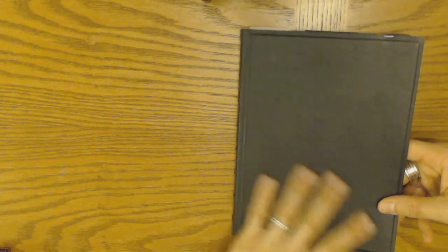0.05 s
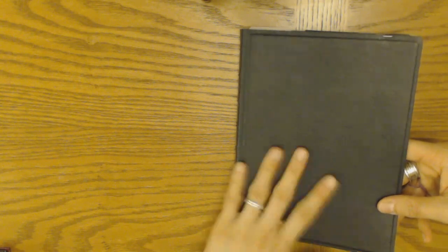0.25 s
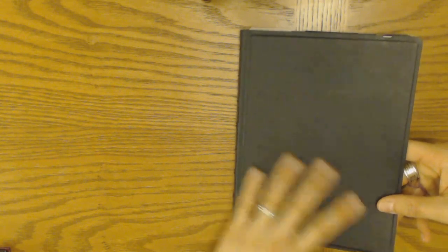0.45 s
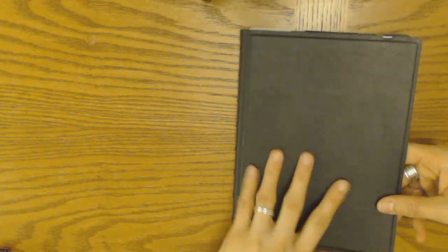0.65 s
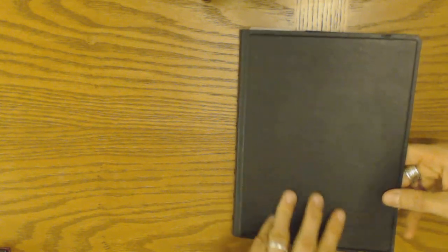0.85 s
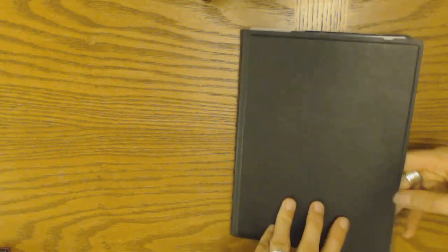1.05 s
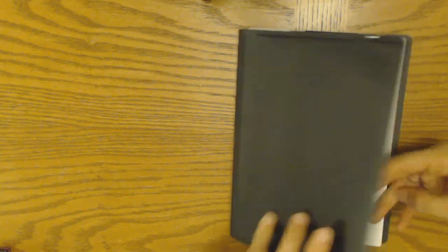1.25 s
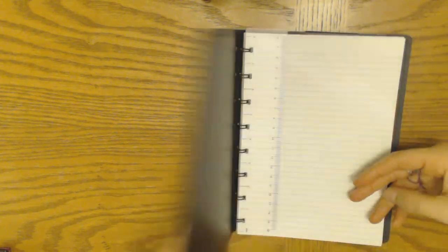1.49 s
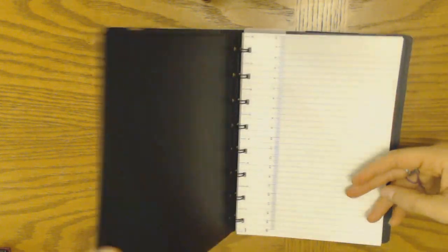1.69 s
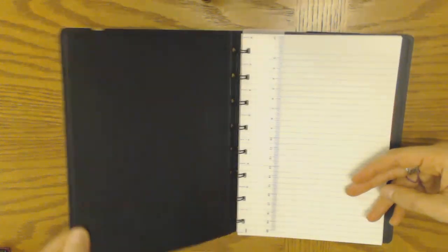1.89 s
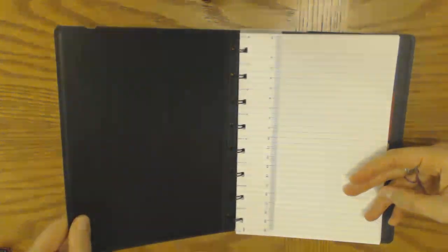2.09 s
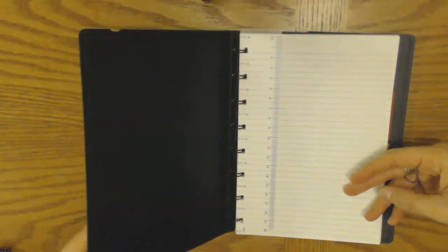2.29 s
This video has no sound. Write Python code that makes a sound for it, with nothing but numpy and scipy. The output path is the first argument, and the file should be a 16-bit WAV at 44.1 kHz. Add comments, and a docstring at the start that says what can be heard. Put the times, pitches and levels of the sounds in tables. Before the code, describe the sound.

A leatherlike notebook is handled and opened close by in a quiet room. A hand softly rubs the cover, which lifts with a click and thump. The spine crackles briefly, then the cover slides and taps the wooden table.

```python
"""A quiet room hisses and rumbles throughout. Close by, a hand rubs to and fro over a leatherlike
notebook cover on a wooden table. A finger taps; the thumb lifts the cover with a click and a thump.
The cover swings open and the bending spine unsticks in a short bright crackle with a faint squeak.
The cover slides out, scrapes the table and lands with a soft tap."""
import sys
import numpy as np
from scipy import signal
from scipy.fft import rfft, irfft, next_fast_len
from scipy.io import wavfile
from scipy.ndimage import map_coordinates

SR = 44100
rng = np.random.default_rng(int(sys.argv[2]) if len(sys.argv) > 2 else 0)


def store_wav(level_fs):
    """Save 16-bit WAV to argv[1]."""
    pcm = np.round(np.clip(np.atleast_2d(level_fs), -1, 1) * 32767)
    wavfile.write(sys.argv[1], SR, pcm.T.astype(np.int16))


N = 102885


def amp(db):
    """Decibels to gain."""
    return 10 ** (np.asarray(db) / 20)


def unit(x):
    """Scale to rms 1."""
    return x / np.sqrt(np.mean(x ** 2) + 1e-20)


def clock():
    """Sample times in seconds."""
    return np.arange(N) / SR


def envelope(points):
    """Gain along (time [s], level [dB]) points, silent outside them."""
    time_s, db = np.transpose(points)
    return amp(np.interp(clock(), time_s, db, left=-200, right=-200))


def coloured(x, colour, tilt_db_oct=0):
    """Minimum-phase filter through (frequency [Hz], gain [dB]) points, tilted above 1 kHz."""
    size = 2 * next_fast_len(len(x))
    octave = np.log2(np.fft.rfftfreq(size, 1 / SR) + 1)
    hz, db = np.transpose(colour)
    tilt_db = tilt_db_oct * np.clip(octave - np.log2(1000), 0, None)
    gain = amp(np.interp(octave, np.log2(hz), db) + tilt_db)
    cepstrum = irfft(np.log(gain))
    cepstrum[1:size // 2] *= 2  # fold to causal
    cepstrum[size // 2 + 1:] = 0
    return irfft(rfft(x, size) * np.exp(rfft(cepstrum)))[:len(x)]


def noise(colour, tilt_db_oct=0):
    """Coloured noise, rms 1."""
    return unit(coloured(rng.standard_normal(N), colour, tilt_db_oct))


def wobble(knots_per_s):
    """Smooth random curve."""
    return map_coordinates(rng.standard_normal(N), [clock() * knots_per_s])


def add(out, start_s, x):
    """Mix x into out."""
    part = out[round(start_s * SR):][:len(x)]
    part += x[:len(part)]


def echoed(x, echoes):
    """x plus delayed copies from nearby surfaces."""
    size = next_fast_len(N + SR // 10)
    hz = np.fft.rfftfreq(size, 1 / SR)
    response = 1 + sum(gain * np.exp(-2j * np.pi * hz * delay_s) for delay_s, gain in echoes)
    return irfft(rfft(x, size) * response, size)[:N]


def ring(modes, attack_s):
    """Damped modes after one contact; alternating signs, slightly random levels."""
    t, out = np.arange(SR // 2) / SR, 0
    for k, (hz, db, t60_s) in enumerate(modes):
        decay = amp(db + rng.normal() - 60 * t / t60_s)
        out += (-1) ** k * decay * np.sin(2 * np.pi * hz * t)
    return (1 - np.exp(-t / attack_s)) * out


def friction(strokes, colour, speed_power, rough_db):
    """Each stroke speeds up and slows down; its grainy hiss follows the speed."""
    out = np.zeros(N)
    for start_s, length_s, db, tilt_db_oct in strokes:
        speed = np.abs(np.sin(np.pi * np.clip((clock() - start_s) / length_s, 0, 1)))
        hiss = unit(noise(colour, tilt_db_oct) * amp(rough_db * wobble(430)))
        out += amp(db) * speed ** speed_power * hiss
    return out


def background():
    """Steady room noise over a very low rumble."""
    # room noise spectrum (frequency [Hz], gain [dB])
    air_colour = [(25, 15), (45, 5.5), (75, 1.5), (115, 9), (160, -2), (220, 2.5), (330, -2), (480, -2),
                  (800, -9.5), (1000, -3), (1150, 2.5), (1350, -7.5), (2050, -7.5), (2500, -19),
                  (4000, -20), (8000, -28), (15500, -34.5)]
    rumble_hz = 12.42
    rumble_shape = [(.5, -35), (.85, -6), (1, 0), (1.2, -10), (2, -32), (10, -100)]
    rumble = noise([(ratio * rumble_hz, db) for ratio, db in rumble_shape])
    return amp(-63.5) * noise(air_colour) + amp(-51) * rumble


def room_tail(x):
    """Short reverberation from the walls, fullest in the bass."""
    # tail bands (low [Hz], high [Hz], t60 [s], gain [dB])
    bands = [(99, 1200, 0.19, -5), (700, 3160, 0.26, -18.5), (2500, 16000, 0.2, -25.5)]
    t, tail, onset_s = np.arange(SR // 2) / SR, 0, 0.0051
    for low_hz, high_hz, t60_s, db in bands:
        decay = rng.standard_normal(len(t)) * amp(-60 * t / t60_s) * (1 - np.exp(-t / onset_s))
        bandpass = signal.butter(2, [low_hz, high_hz], "band", fs=SR, output="sos")
        tail += amp(db) * signal.sosfilt(bandpass, decay / np.linalg.norm(decay))
    return signal.fftconvolve(x, tail)[:N]


def squeaks():
    """Stick-slip settles briefly into an unsteady gliding tone."""
    # skin and spine (start [s], length [s], level [dB], first [Hz], last [Hz])
    glides = [(0.015, 0.068, -71, 5120, 5150), (1.451, 0.023, -66, 4610, 4400),
              (1.57, 0.026, -52, 808.5, 1120)]
    out, jitter = np.zeros(N), .045
    for start_s, length_s, db, first_hz, last_hz in glides:
        progress = np.clip((clock() - start_s) / length_s, 0, 1)
        hz = (first_hz + (last_hz - first_hz) * progress) * (1 + jitter * wobble(600))
        tone = np.sqrt(2) * np.sin(2 * np.pi * np.cumsum(hz) / SR)
        out += amp(db) * np.sin(np.pi * progress) * tone
    return out


def sliding():
    """The open cover slides out, then scrapes the table."""
    # slide envelope (time [s], level [dB])
    slide_levels = [(1.48, -72), (1.59, -64), (1.63, -68.5), (1.68, -73), (1.8, -74), (1.92, -75),
                    (2.0, -83.5), (2.1, -96.5)]
    # table scrapes (start [s], length [s], level [dB], tilt [dB/oct])
    scrapes = [(2.012, 0.037, -65, -2), (2.045, 0.048, -67.5, -1.5), (2.08, 0.087, -64.5, -1),
               (2.155, 0.042, -67, 0.5)]
    # slide and scrape spectra (frequency [Hz], gain [dB])
    slide_colour = [(300, -4.5), (1200, -1.5), (2500, -5), (4000, 0), (7000, 0.5), (10000, -7),
                    (15500, -14)]
    table_colour = [(300, -0.5), (800, -2), (1150, 6), (2000, -5), (2700, -6.5), (3500, -7.5), (4350, -3),
                    (5200, -14.5), (8000, -20), (15500, -26)]
    slide = envelope(slide_levels) * noise(slide_colour)
    return slide + friction(scrapes, table_colour, speed_power=0.73, rough_db=3.0)


def scuffing():
    """Fingers scuff the cover's edge."""
    # finger strokes (start [s], length [s], level [dB], tilt [dB/oct])
    scuffs = [(1.215, 0.083, -62.5, -0.5), (1.266, 0.032, -56.5, 1), (1.293, 0.023, -59.5, -1),
              (1.305, 0.044, -64, -3), (1.408, .125, -66.5, 3.5), (1.45, .035, -67.5, 4)]
    # edge spectrum (frequency [Hz], gain [dB])
    edge_colour = [(300, 6), (800, -10), (1200, 8), (2000, -6.5), (2700, -14), (3900, -13), (4550, 0),
                   (5300, -12), (7000, -9.5), (9500, -13), (11800, -6), (12700, -6), (15500, -19)]
    return friction(scuffs, edge_colour, speed_power=1.1, rough_db=3.5)


def rubbing():
    """The palm strokes the cover while the heel of the hand drags; the table reflects both."""
    # palm strokes (start [s], length [s], level [dB], tilt [dB/oct])
    strokes = [(-.04, 0.22, -60.5, -3.5), (.138, 0.16, -59, -0.5), (.304, 0.16, -60.5, -0.5),
               (.454, 0.14, -58.5, -0.1), (.598, 0.15, -63, -0.5), (.83, 0.28, -69.5, -0.7)]
    # heel drag (time [s], level [dB])
    drag_levels = [(0, -66.5), (.2, -86), (.6, -84), (.75, -85), (1.2, -89)]
    # skin on the cover (frequency [Hz], gain [dB])
    skin_colour = [(100, 1.5), (550, -2), (800, -3.5), (1080, -3), (1230, 3.5), (1400, -0.5), (1780, 3),
                   (1970, 10), (2200, -1.5), (2600, -8), (3150, 0.5), (3700, -0.5), (5000, -1.5),
                   (7000, -0.5), (11000, -2.5), (15500, -5.5)]
    palm = friction(strokes, skin_colour, speed_power=1.09, rough_db=1.1)
    heel = envelope(drag_levels) * noise(skin_colour)
    echo_s, echo_gain = 0.000708, 0.21
    return echoed(palm + heel, [(echo_s, echo_gain)])


def ticks():
    """Very short bright contacts of binding and fingernails."""
    # contacts (time [s], level [dB], spectral peak [Hz])
    contacts = [(.918, -70, 13500), (1.203, -61, 15000), (1.2573, -40, 7000), (1.5118, -39.5, 15000),
                (1.523, -35.5, 15000), (1.5312, -35, 6000), (1.5824, -37.5, 6000), (2.209, -57.5, 10000)]
    out, t, t60_s = np.zeros(N), np.arange(SR // 40) / SR, 0.0022
    for time_s, db, hz in contacts:
        colour = [(hz / 12, -35), (hz / 3, -14), (hz * 0.36, -9), (hz, 0), (hz * 2, -7)]
        burst = unit(coloured(rng.standard_normal(len(t)), colour))
        add(out, time_s, amp(db - 60 * t / t60_s) * burst)
    return out


def taps():
    """Soft contacts ring the notebook on the table."""
    # finger tap, cover landing (time [s], gain [dB], low-pass [Hz])
    contacts = [(0.966, -46, 515), (2.1544, -40, 1497)]
    # notebook modes (frequency [Hz], level [dB], t60 [s])
    book_modes = [(160.5, -10, 0.11), (221, -8.5, 0.24), (295, -7.5, 0.076), (365, -1.5, 0.053),
                  (414, -5.5, 0.087), (490, -8, .1), (649, -0.5, 0.026), (960, -4, 0.022),
                  (1160, -9, 0.058), (1393, 0.5, 0.023)]
    out = np.zeros(N)
    for time_s, db, cutoff_hz in contacts:
        lowpass = signal.butter(3, cutoff_hz, fs=SR, output="sos")
        add(out, time_s, amp(db) * signal.sosfilt(lowpass, ring(book_modes, attack_s=0.00025)))
    return out


def cover_lift():
    """The cover snaps free, rings, and thumps as it moves."""
    # cover modes (frequency [Hz], level [dB], t60 [s])
    cover_modes = [(120, -8.5, 0.081), (187.3, -3, 0.11), (234.2, -14.5, .35), (310, -9.5, 0.11),
                   (419, -7.5, 0.05), (620, -12, .02), (1135, -11.5, 0.14), (1163, -13.5, 0.17),
                   (1313, 4.5, 0.018), (1580, 3.5, 0.014), (2000, 1.5, 0.0124), (3050, -12.5, 0.013)]
    # low thumps (time [s], frequency [Hz], level [dB], attack [s], t60 [s])
    thumps = [(1.261, 52.9, -36, 0.0058, .22), (1.458, 36, -40.5, 0.013, .14)]
    out, release_s = np.zeros(N), 1.2585
    add(out, release_s, amp(-39.5) * ring(cover_modes, attack_s=0.00036))
    for time_s, hz, db, attack_s, t60_s in thumps:
        add(out, time_s, ring([(hz, db, t60_s)], attack_s))
    return out


def spine_crackle():
    """The bending spine unsticks in dense tiny slips and a few sharp snaps, which shake the cover."""
    # slip and cover-flex envelopes (time [s], level [dB])
    slip_levels = [(1.530, -71.5), (1.5365, -45), (1.5385, -30.5), (1.545, -33), (1.553, -27),
                   (1.5615, -27.5), (1.5635, -40), (1.572, -44.5), (1.595, -78), (1.62, -81.5)]
    flex_levels = [(1.53, -91), (1.55, -50.5), (1.565, -46), (1.58, -52.5), (1.595, -75), (1.62, -84)]
    # spine and cover spectra (frequency [Hz], gain [dB])
    spine_colour = [(300, -24), (1000, -25), (1800, -10), (2500, -17.5), (4500, -9.5), (6200, 1),
                    (8300, -1.5), (10000, 2), (13000, -5.5), (15300, -6), (16500, -23.5)]
    flex_colour = [(150, -11), (330, -7), (500, 4.5), (650, -9), (930, 1.5), (1300, -10), (1900, -4.5),
                   (3500, -11.5)]
    # loudest snaps (time [s], peak [dB])
    snaps = [(1.549, -14.5), (1.5543, -16.5), (1.5553, -12), (1.560, -14)]
    # reflections off page, table and cover (delay [s], gain)
    echoes = [(.00097, 0.21), (.00263, 0.14), (.0046, .14)]
    slips_per_s, spread_db = 12000, 2.5
    slips = (rng.random(N) < slips_per_s / SR) * rng.choice([-1, 1], N)
    sizes = amp(spread_db * np.clip(rng.standard_normal(N), -2, 2))
    crackle = envelope(slip_levels) * unit(coloured(slips * sizes, spine_colour))
    snap = coloured(signal.unit_impulse(SR // 50), spine_colour)
    for time_s, db in snaps:
        add(crackle, time_s, amp(db) * snap / np.abs(snap).max())
    return echoed(crackle, echoes) + envelope(flex_levels) * noise(flex_colour)


def scene():
    """Notebook and room at one close microphone."""
    book = rubbing() + scuffing() + sliding() + taps() + cover_lift()
    book += ticks() + squeaks() + spine_crackle()
    return (book + room_tail(book) + background())[None]


def record(dry):
    """Steep zero-phase low-pass."""
    cutoff_hz = 16000
    return signal.sosfiltfilt(signal.cheby1(12, .05, cutoff_hz, fs=SR, output="sos"), dry)


dry = scene()
out = record(dry)
store_wav(out)
```